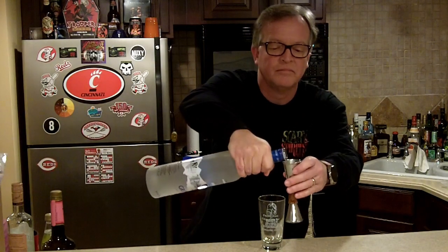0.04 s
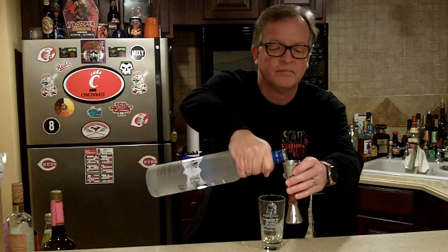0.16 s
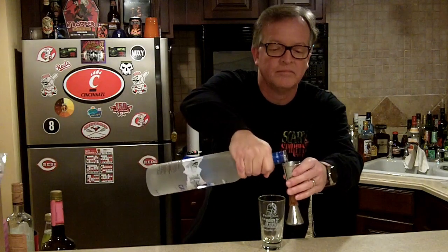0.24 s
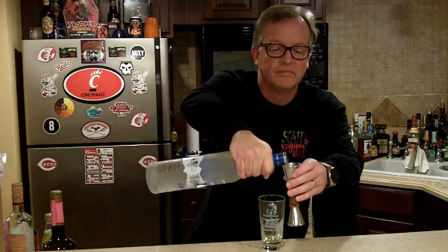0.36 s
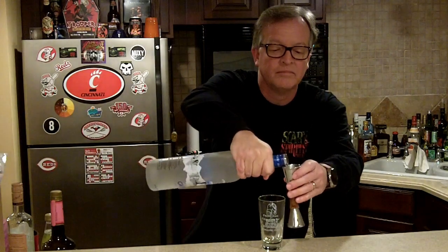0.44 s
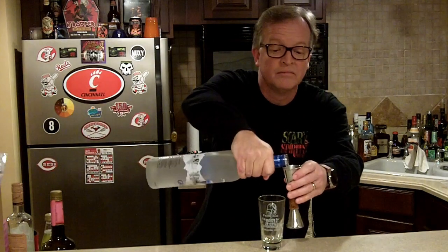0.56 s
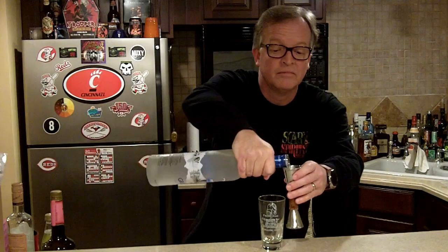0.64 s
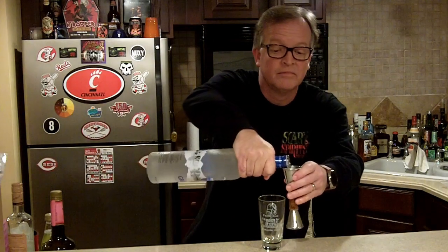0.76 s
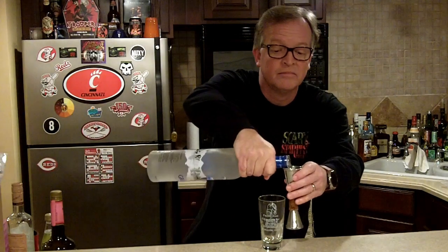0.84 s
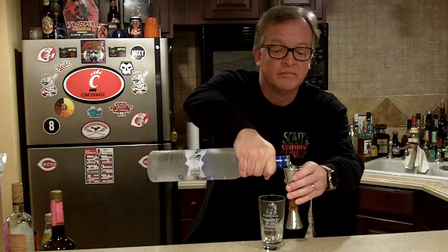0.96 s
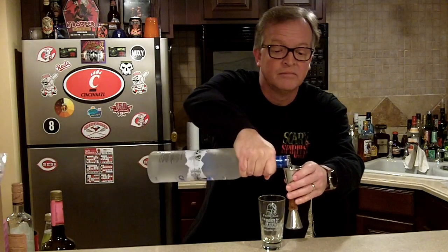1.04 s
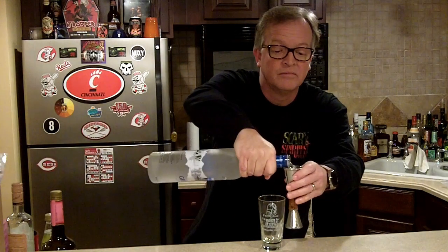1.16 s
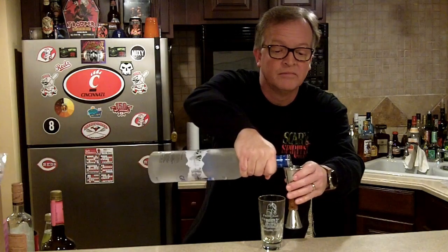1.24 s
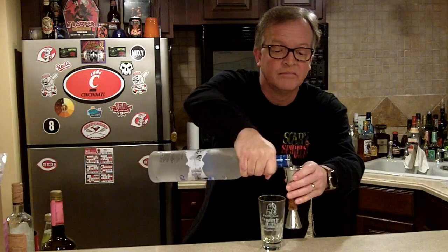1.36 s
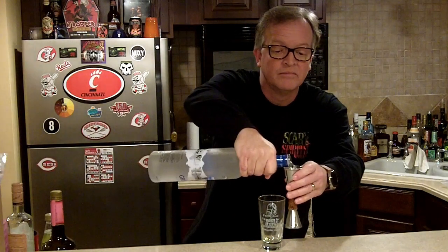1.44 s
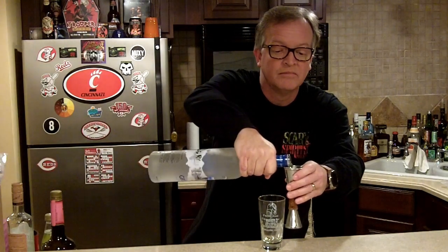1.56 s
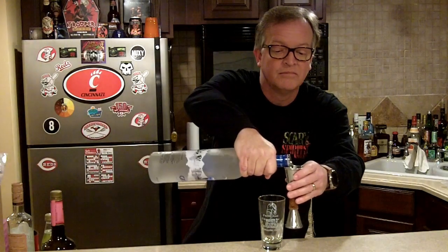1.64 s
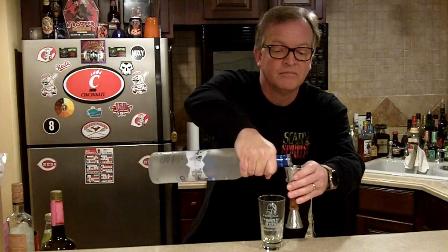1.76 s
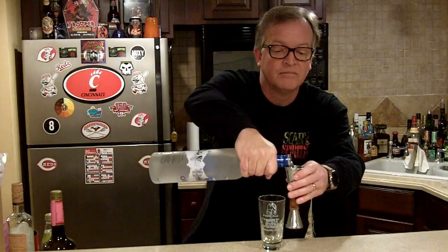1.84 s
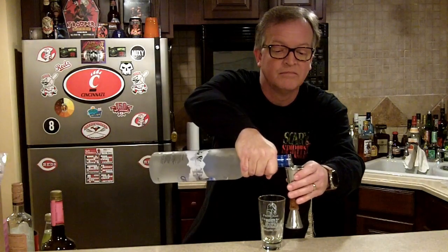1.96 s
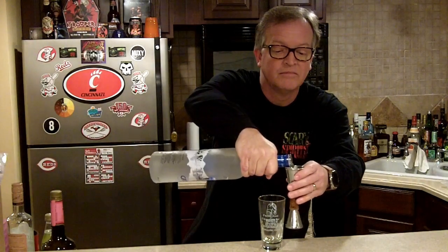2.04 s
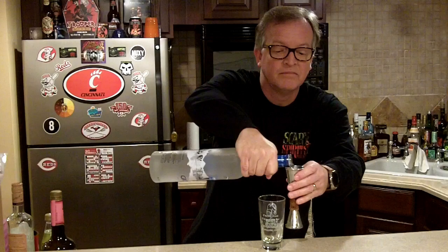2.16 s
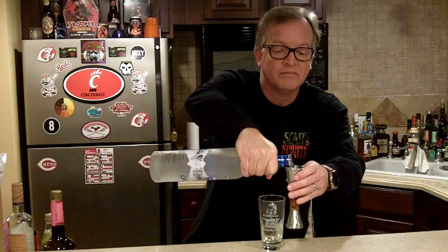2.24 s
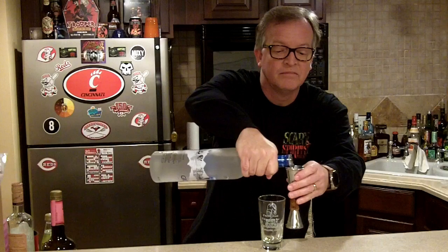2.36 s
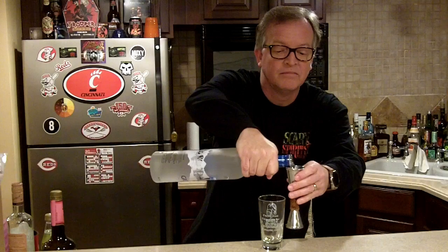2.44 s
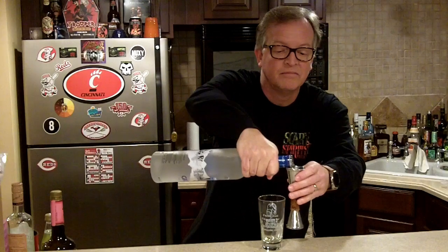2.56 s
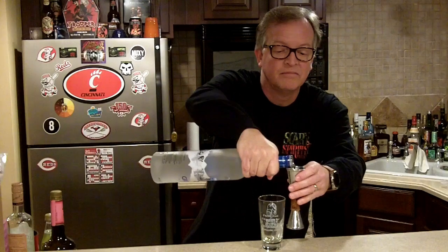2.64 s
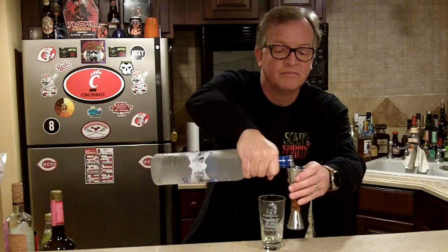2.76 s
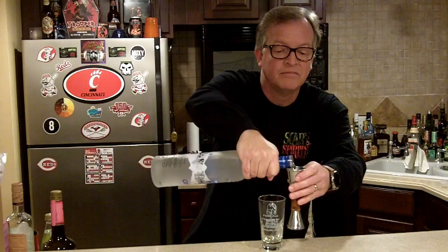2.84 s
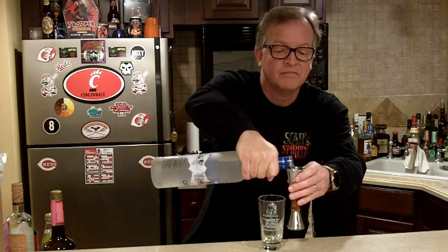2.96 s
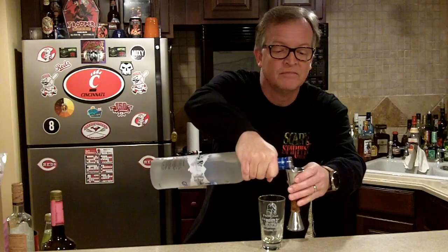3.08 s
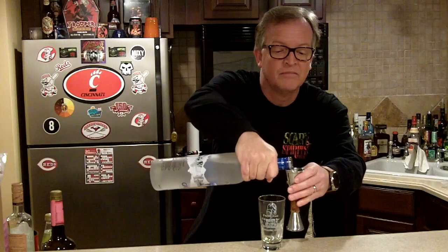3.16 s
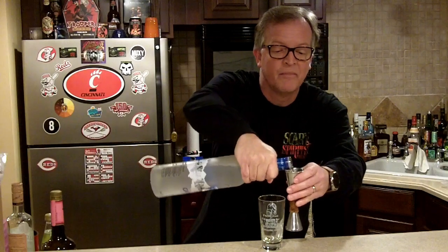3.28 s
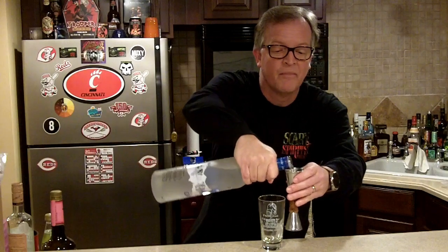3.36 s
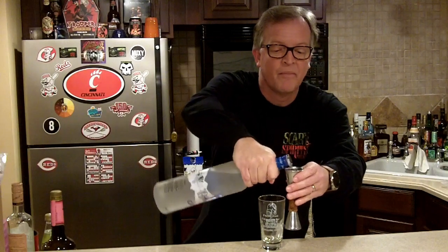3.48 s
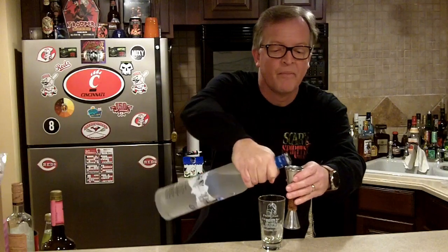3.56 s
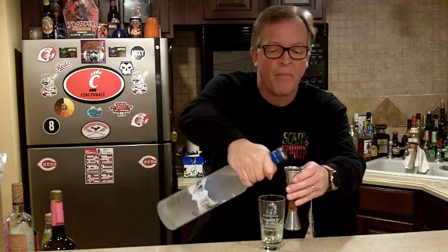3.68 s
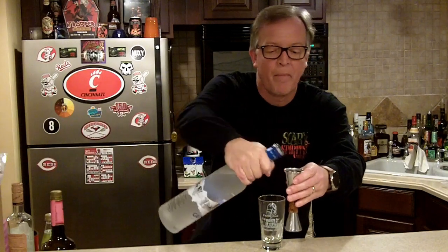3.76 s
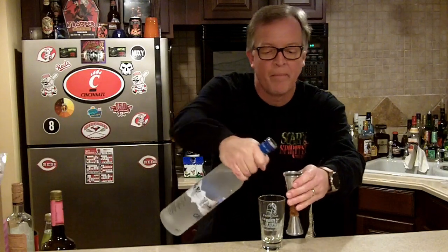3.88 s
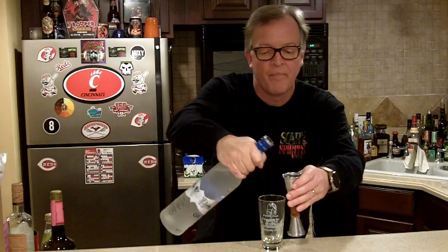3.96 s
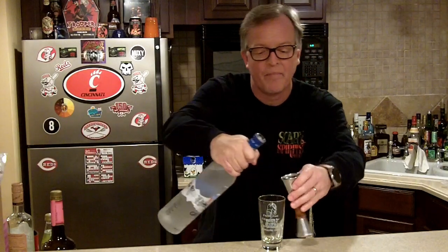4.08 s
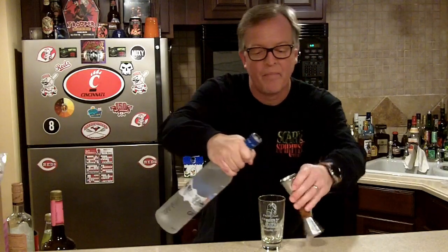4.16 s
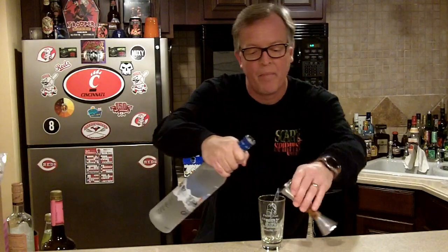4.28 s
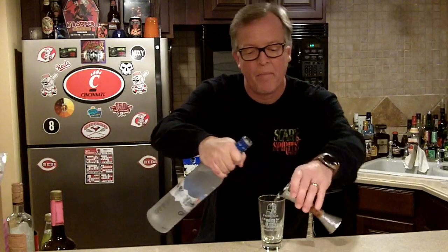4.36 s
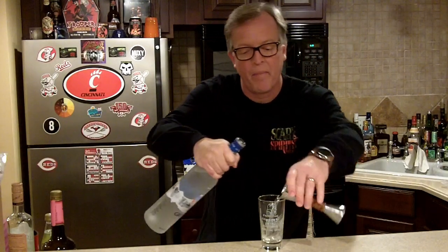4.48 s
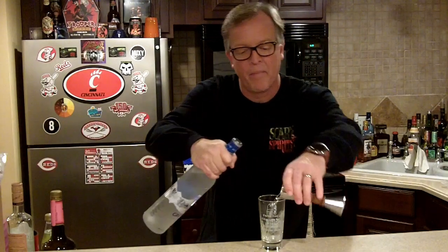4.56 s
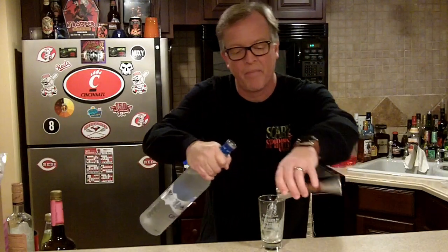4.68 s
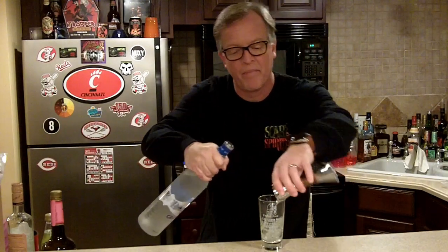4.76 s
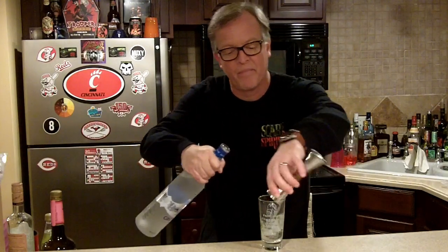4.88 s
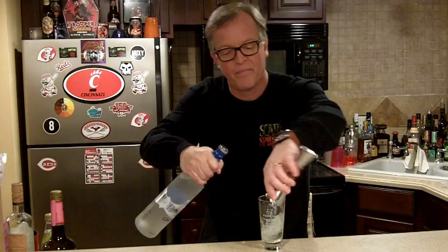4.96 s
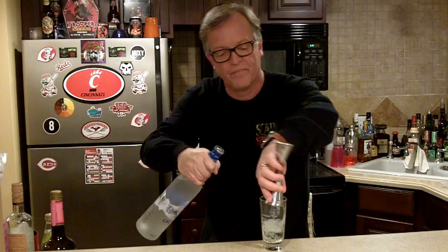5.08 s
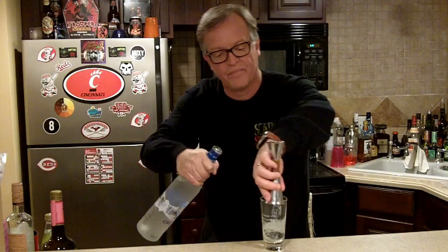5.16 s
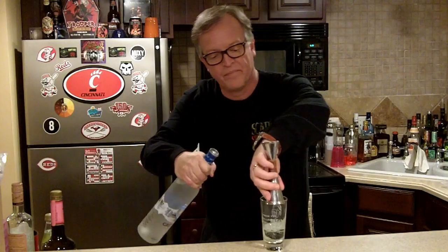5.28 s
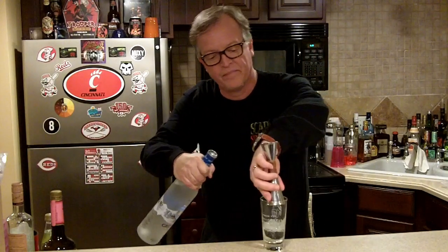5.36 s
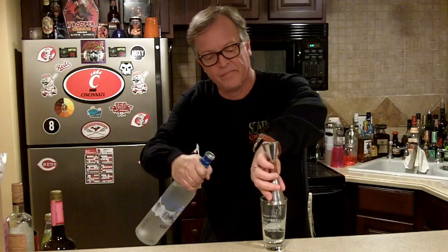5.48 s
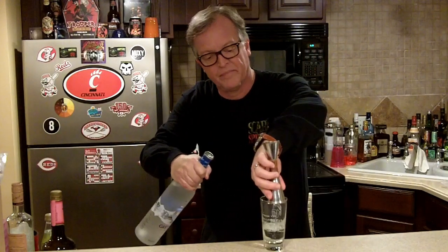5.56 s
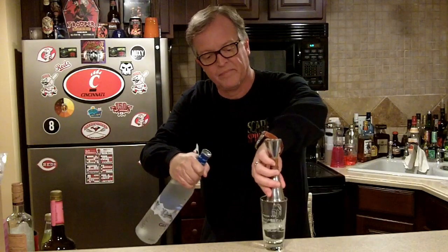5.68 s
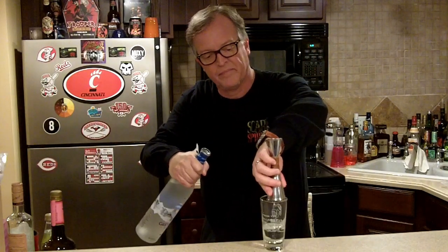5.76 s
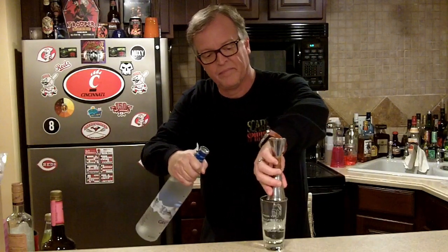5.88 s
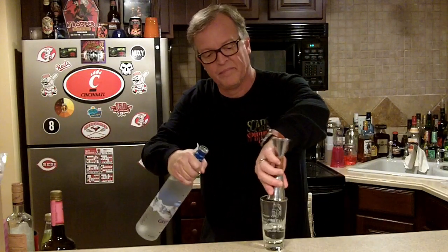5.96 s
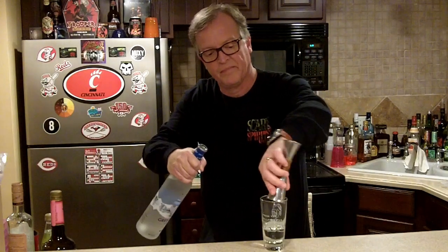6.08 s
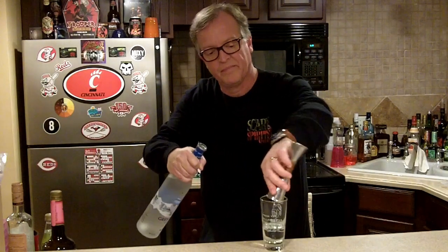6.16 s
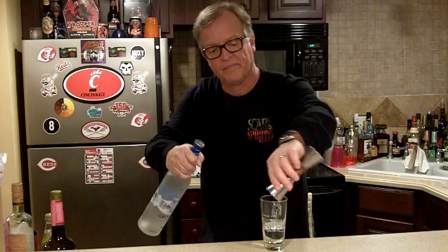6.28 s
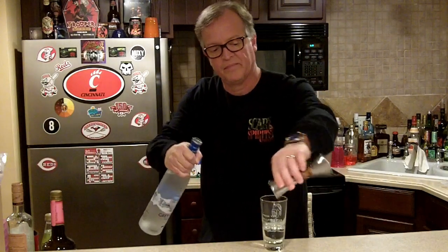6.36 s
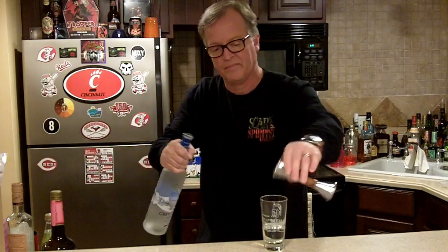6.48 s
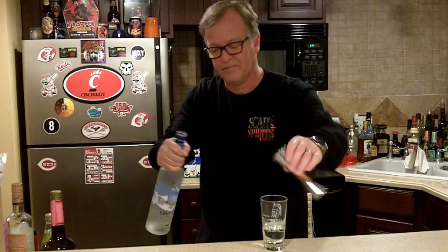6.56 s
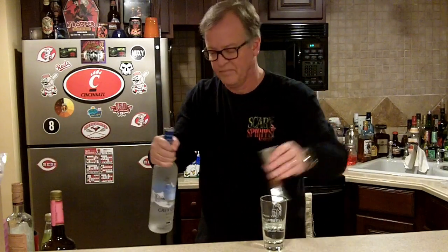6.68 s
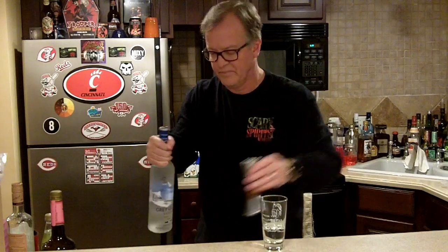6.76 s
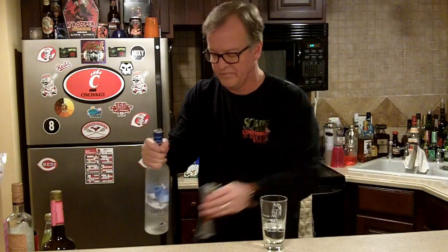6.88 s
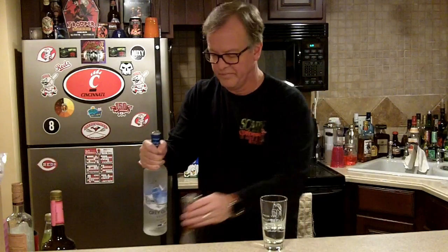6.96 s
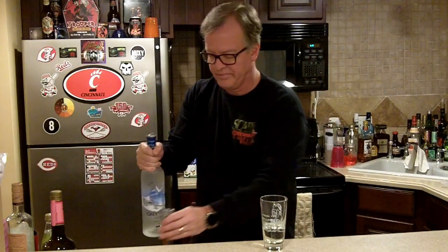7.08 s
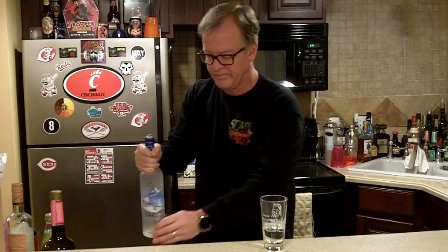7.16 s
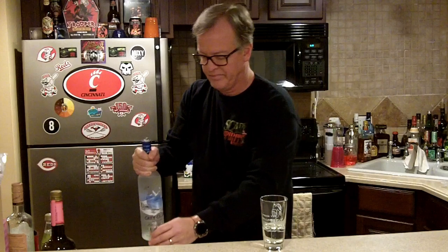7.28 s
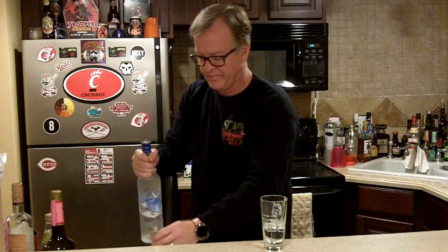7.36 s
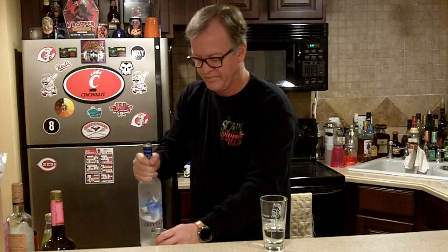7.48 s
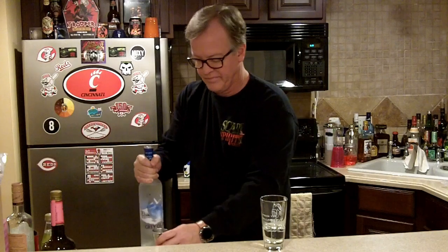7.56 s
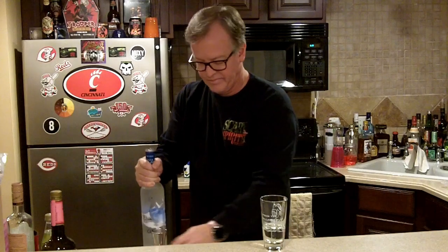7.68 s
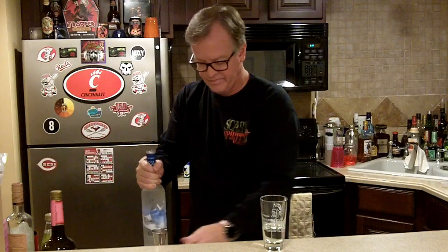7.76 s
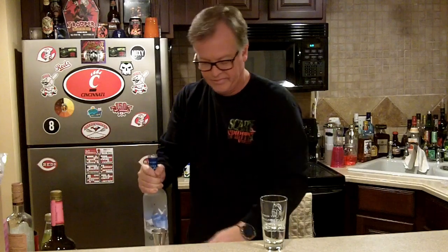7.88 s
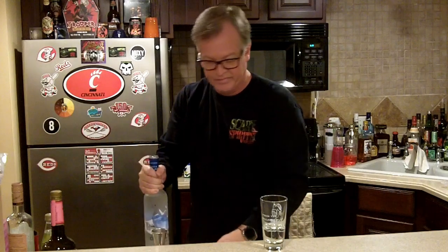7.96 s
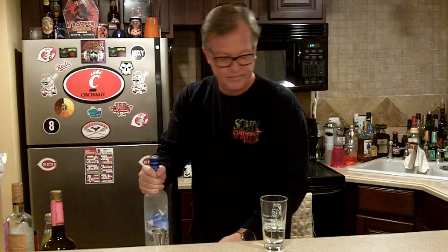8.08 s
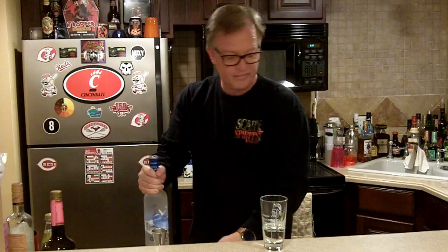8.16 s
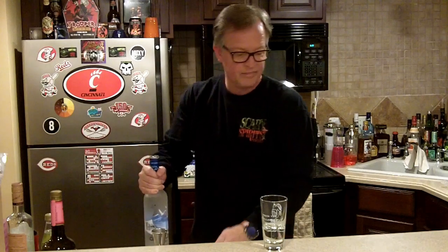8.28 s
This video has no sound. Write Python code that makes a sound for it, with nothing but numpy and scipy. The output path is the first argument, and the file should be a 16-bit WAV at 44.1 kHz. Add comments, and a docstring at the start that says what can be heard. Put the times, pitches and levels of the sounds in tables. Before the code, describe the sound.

In a quiet kitchen, a long glass bottle glugs about five times a second into a small metal measure, with tiny drips and trickles. The measure clinks on a drinking glass, its liquid splashes in with bubbly plops, then it taps the rim several times. The cup lands on the counter with a sharp knock, followed by a heavier bottle thud. A nearby camera microphone adds low rumble, soft hiss and faint whine.

```python
"""In a quiet kitchen a long bottle glugs into a small metal cup; the cup is tipped into a glass,
tapped on its rim a few times and set down on the counter, then the bottle. A camera hisses and whines.
Bubbles, glass, metal and counter ring as dying sines; cracks, thuds, hiss and a brief brush are
shaped noise; spray is a crowd of tiny bubbles. Echoes and a decaying tail answer all but the camera."""
import sys
import numpy as np
from scipy import signal
from scipy.fft import rfft, irfft, next_fast_len
from scipy.io import wavfile
from scipy.ndimage import uniform_filter1d

SR = 44100
rng = np.random.default_rng(int(sys.argv[2]) if len(sys.argv) > 2 else 0)


def unload_audio(sound):
    """Save the sound as a 16-bit wav file, at the path given as the first command line argument."""
    columns = np.transpose(np.atleast_2d(sound))
    # keep every value between -1 and 1, then stretch to whole-number steps
    steps = np.round(np.clip(columns, -1, 1) * 32767)
    wavfile.write(sys.argv[1], SR, steps.astype(np.int16))


N = 367308  # samples

# camera rumble and hiss, spectrum: (frequency [Hz], relative density [dB per Hz])
HISS_SPECTRUM = [(5, -1.5), (25, -0.5), (60, -8), (150, -16.5), (400, -22.5), (1000, -30.5), (2000, -35.5),
                 (3200, -40), (4500, -43.5), (6200, -43), (7000, -41.5), (10000, -41.5), (15000, -42)]
# channel difference: (frequency [Hz], gain on the difference noise [dB])
SIDE_SPECTRUM = [(60, -21.5), (110, -22), (200, -20.5), (380, -17.5), (700, -13.5), (1290, -11), (2380, -7),
                 (4400, -11.5), (8120, -6.5), (15000, -2)]
# steady whines: (frequency [Hz], level [dB rms])
WHINES = [(1200, -80), (1320, -85), (2398, -90), (7866.7, -85)]
# tones gated once a camera frame: (frequency [Hz], level while on [dB rms])
FRAME_TONES = [(3066, -73), (8520, -86), (10935, -85), (6800, -89), (11600, -89)]
HISS_DB = -52.5
FRAME_HZ, MID_BURST_S, FRAME_DUTY = 29.97, 3.8132, 0.42  # duty: share of the frame switched on
# microphone cavity: (frequency [Hz], width [Hz], gain at centre [dB])
CAVITY_NOTCHES = [(5470, 440, -28), (5320, 890, -6)]
# resting offset, one row a channel: (offset [full scale])
CHANNEL_OFFSET = [
    [-.00485],
    [.0013],
]
BAND_LIMIT_HZ = 15170

# reverberant tail: (frequency [Hz], t60 [s])
ROOM_T60 = [(60, 0.44), (150, 0.36), (500, 0.36), (2000, 0.32), (5000, 0.3), (12000, 0.19)]
# flutter between facing cupboards: (delay [s], gain [dB])
CUPBOARD_ECHOES = [(.022, -12), (0.041, -19), (.063, -21)]

# cup meets counter: (time [s], level [dB], contact [s], tilt [dB per octave])
CUP_LANDINGS = [(7.4905, -23.5, 0.01, 0.48), (7.729, -47.5, 0.0066, -1.7), (7.746, -49, 0.0025, -2),
                (7.772, -50, 0.013, -4.5), (7.82, -58.5, 0.024, -4)]
# bottle meets counter: (time [s], level [dB], contact [s], tilt [dB per octave])
BOTTLE_LANDINGS = [(8.026, -17.5, 0.018, 0.46), (8.287, -43, 0.023, -5)]
# colour of the cup contact: (frequency [Hz], relative density [dB per Hz])
CUP_THUD_SPECTRUM = [(30, -33), (80, -14), (181, 1.5), (471, -4), (1480, 0), (2700, -8), (4440, -17.5),
                     (6000, -17.5), (8500, -19), (10700, -35), (15000, -42)]
# colour of the bottle contact: (frequency [Hz], relative density [dB per Hz])
BOTTLE_THUD_SPECTRUM = [(18, -39), (30, -13), (150, 4.5), (288, -6.5), (698, -6.5), (815, -12.5),
                        (1090, -8.5), (1690, -13.5), (2030, -14.5), (5440, -39.5), (6040, -36), (8470, -45),
                        (15000, -65)]
# cup ringing on the counter: (frequency [Hz], relative level [dB], t60 [s])
CUP_COUNTER_MODES = [(123, -2.5, 0.18), (157.4, 2, .15), (196, 3.5, 0.18), (315.4, -8, 0.35),
                     (713, -9.5, 0.32), (1030, -12, 0.064), (1280, -21, 0.14), (1580, -6, 0.18),
                     (1900, -11, 0.22), (2086, -6.5, 0.11), (2356, 1.5, 0.074), (2740, 7.5, 0.021),
                     (4130, -1, 0.059), (6120, -12, 0.17), (7060, -10, 0.1), (8400, -2, 0.1),
                     (8410, -16, 0.19), (9367, -16, 0.12)]
# bottle ringing on the counter: (frequency [Hz], relative level [dB], t60 [s])
BOTTLE_COUNTER_MODES = [(127.6, 6, 0.22), (156, -5, 0.23), (203, -2.5, 0.2), (290, -7, 0.24),
                        (337, -6.5, 0.29), (402, 0.5, 0.17), (483, -7.5, 0.21), (640, -9, 0.19),
                        (701, -7, 0.22), (926, -3, 0.14), (1120, 1, 0.14), (1500, -13, 0.28),
                        (1890, -10, 0.28), (2010, -25.5, 0.62), (6100, -30, 0.33), (6266, -28, 0.19),
                        (8450, -26, 0.29)]
RING_UNDER_THUD_DB, RING_DB_PER_TILT_DB = -7, 2.7  # a duller contact rings less
# one brief brush: (time [s], Gaussian half length [s], level [dB], centre [Hz], width [Hz])
BRUSH = (8.192, .013, -56, 8000, 3000)

# cup on glass: (time [s], crack level [dB], crack tilt [dB per octave], glass level [dB],
#   cup level [dB], hollow frequency [Hz], hollow level [dB], freedom: factor on glass t60 [-])
CLINK_EVENTS = [(4.4865, -28, -3.5, -29.5, -28.5, 1346, -49, 0.46),
                (4.4971, -32.5, -2.5, -40, -38, 620, -45, 0.45),
                (5.606, -35, 1.3, -31.5, -29.5, 775, -38.5, 0.14),
                (5.873, -33, 1.5, -36.5, -32, 914, -38.5, 1.18),
                (6.134, -37.5, 0.7, -36, -37, 870, -38.5, 0.63),
                (6.379, -39.5, 1.5, -40, -38, 923, -54, 1.28)]
# glass, low and high group: (frequency [Hz], relative level [dB], t60 at freedom 1 [s])
GLASS_GROUPS = [(2454, -5.5, 0.42), (2488, -2.5, 0.065)], [(4220, -2, 0.28), (4200, -23, 0.34),
                (4150, -8, 0.12)]
# cup, low and high group: (frequency [Hz], relative level [dB], t60 before damping [s])
CUP_GROUPS = ([(6100, -27, 0.16), (6300, -22, 0.044), (6430, -24, 0.084), (7265, -6.5, 0.22),
              (7300, -1, 0.1)], [(8250, -2, 0.13), (8600, -23, 0.067), (9300, -6, 0.057), (9900, -9.5, 0.1),
              (11400, -9.5, 0.072), (12150, -10, .07)])
# crack of a hard contact, also snap of a bubble: (frequency [Hz], relative density [dB per Hz])
CRACK_SPECTRUM = [(80, -19), (200, -1.5), (900, 1), (2500, -4), (4500, -9), (8250, -3), (11900, -26),
                  (15000, -42)]
# cup knocks inside the filled glass: (time [s], reference level [dB])
INNER_KNOCK = (5.1135, -29.5)
# filled glass and cup together: (frequency [Hz], relative level [dB], t60 [s])
FILLED_MODES = [(469, -3.5, 0.065), (783, 2.5, 0.11), (1580, -18, .09), (2532, -11, 0.19),
                (2510, -6.5, 0.095), (4370, -15.5, 0.14), (6200, -0.5, 0.069), (6840, -5, 0.074),
                (7600, 9.5, 0.051), (8330, 4.5, 0.052), (9300, -27, .14), (9502, -24, 0.1),
                (11500, -15, 0.097), (11920, -13, 0.077)]
# high group against its low group: at freedom 0 [dB], per unit of freedom [dB]
GLASS_TOP_DAMPED_DB, GLASS_TOP_PER_FREEDOM_DB = -9.5, 5.5
CUP_TOP_DAMPED_DB, CUP_TOP_PER_FREEDOM_DB = -15.5, 13
CUP_DAMPED, CUP_PER_FREEDOM = 0.33, 0.22  # factor on cup t60 at freedom 0, its rise per unit

# loudest bubbles and drops in cup and glass: (time [s], level [dB], starting pitch [Hz])
DROP_EVENTS = [(1.080, -49, 3460), (1.080, -53, 2360), (1.114, -38, 3400), (1.114, -44, 6450),
               (1.130, -35, 1526), (1.206, -42, 3130), (1.204, -47, 6260), (1.312, -50.5, 1800),
               (1.393, -39, 4640), (1.394, -47, 866), (1.421, -46.5, 1735), (1.508, -45.5, 6170),
               (1.577, -52.5, 2230), (1.67, -53, 1880), (1.776, -52, 2280), (1.854, -53, 6530),
               (4.65, -55, 4800), (4.679, -51, 3700), (4.679, -48, 7000), (4.70, -44, 4620),
               (4.74, -46, 3440), (4.774, -40, 3740), (4.772, -44.5, 2340), (4.79, -46.5, 1650),
               (4.80, -48, 943), (4.862, -48, 1220), (4.876, -37.5, 1314), (4.876, -46, 940),
               (4.905, -45, 4720), (5.029, -38, 920), (5.045, -41, 7800), (5.14, -41, 685),
               (5.17, -33.5, 765), (5.26, -45.5, 11300)]
DROP_T60_1KHZ_S, DROP_SHORTENING = 0.048, 0.48  # t60 falls as pitch to this power
# surges of spray: (time [s], hold [s], lower part level [dB], fine upper part level [dB])
SURGES = [(1.117, 0.023, -55, -70), (1.192, .02, -55, -61.5), (1.3, .05, -65, -75),
          (1.38, 0.024, -60.5, -74), (1.56, 0.13, -69, -80), (1.706, .015, -63, -65),
          (1.868, 0.014, -72, -82), (4.661, 0.084, -72, -64.5), (4.776, 0.11, -56, -63),
          (4.959, 0.23, -63.5, -66), (5.226, .02, -77, -68.5)]
SURGE_RISE_S, SURGE_T60_S = 0.0077, 0.24

# air bubbles entering the bottle neck: (time [s], level [dB], neck pitch [Hz])
GLUG_EVENTS = [(0.0464, -42, 996), (0.2591, -38.5, 1039), (0.462, -38, 1081), (0.6532, -35, 1101),
               (0.843, -36.5, 1092), (1.013, -34.5, 1087), (1.1885, -35, 1062), (1.3625, -36.5, 1083),
               (1.539, -36, 1063), (1.716, -40, 1096), (1.8921, -37.5, 1095), (2.1009, -42.5, 1119),
               (2.309, -40, 1119), (2.5232, -37.5, 1150), (2.7343, -47.5, 1114), (2.9498, -41.5, 1140),
               (3.1758, -49.5, 1122)]
# air in the neck: (multiple of neck pitch [-], relative level [dB], t60 [s])
NECK_MODES = [(0.661, -12, 0.035), (1, 1.5, 0.063), (1.33, -21, 0.037), (2.6, -13.5, 0.03),
              (2.78, -13, 0.025), (4.2, -15.5, 0.02), (5.6, -25, 0.025), (7.3, -36, .015)]
# light touches of bottle and cup: (time [s], level [dB],
#   modes as (frequency [Hz], relative level [dB], t60 [s]))
TOUCH_EVENTS = [(.160, -47, [(1930, -8.5, 0.48), (1830, 3, 0.034)]), (3.2515, -52, [(6500, 7, 0.032),
                (4080, -13, 0.14), (5760, -12, .1), (7500, -11, .06), (6800, -7, 0.043)])]


def gain_of(db):
    """Level in dB to amplitude factor."""
    return 10 ** (np.asarray(db) / 20)


def evened(x):
    """Scales to unit rms."""
    return x / np.sqrt(np.mean(x ** 2) + 1e-20)


def read(points, hz):
    """Interpolates a table over log frequency."""
    f, value = np.transpose(points)
    return np.interp(np.log(hz + 1), np.log(f + 1), value)


def add(mix, s, sound):
    """Adds a sound in place at s seconds, cut at the end of the mix."""
    part = mix[round(s * SR):][:len(sound)]
    part += sound[:len(part)]


def filtered(x, points, tilt_db=0):
    """Shapes x by a spectrum and a tilt in dB per octave around 1 kHz."""
    size = next_fast_len(len(x))
    hz = np.fft.rfftfreq(size, 1 / SR)
    gain_db = read(points, hz) + tilt_db * np.log2(hz / 1000 + 0.012)
    return irfft(rfft(x, size) * gain_of(gain_db), size)[:len(x)]


def coloured(x, points, tilt_db=0):
    """Shaped by a spectrum, at unit rms."""
    return evened(filtered(x, points, tilt_db))


def ring(modes, rise_s=0.00036, glide=0):
    """Dying sines; glide lifts the pitch as a bubble nears the surface."""
    hz, db, t60 = np.transpose(modes)[..., None]
    t = np.arange(int(t60.max() * SR) + 1) / SR
    start = rng.choice([0, 0.5], hz.shape)  # a blow starts each mode up or down
    turns = hz * (t + glide * t ** 2 / t60) + start
    decay = gain_of(db - 60 * t / t60)
    return (decay * np.sin(2 * np.pi * turns)).sum(0) * (1 - np.exp(-t / rise_s))


def burst(points, hold_s, t60_s, tilt_db=0):
    """Coloured noise that starts at once, holds through the contact and dies."""
    t = np.arange(8192) / SR
    decay = gain_of(-60 * np.maximum(t - hold_s, 0) / t60_s)
    shape = decay * (1 - np.exp(-t / 0.00046))
    return coloured(rng.standard_normal(len(t)), points, tilt_db) * shape


def tones(rows, t):
    """Sum of steady sines of given rms level and random phase."""
    out = 0
    for hz, db in rows:
        out = out + np.sqrt(2) * gain_of(db) * np.sin(2 * np.pi * (hz * t + rng.random()))
    return out


def camera():
    """Rumble and hiss, steady whines, and tones switched on once every camera frame."""
    t = np.arange(N) / SR
    # clock restarts every frame, so the bursts are alike
    frame_t = (((t - MID_BURST_S) * FRAME_HZ + 0.5) % 1 - 0.5) / FRAME_HZ
    on = abs(frame_t) < FRAME_DUTY / FRAME_HZ / 2
    gate = uniform_filter1d(1.0 * on, size=40)
    shared = gain_of(HISS_DB) * coloured(rng.standard_normal(N), HISS_SPECTRUM)
    other = gain_of(HISS_DB) * coloured(rng.standard_normal(N), HISS_SPECTRUM)
    mid = shared + tones(WHINES, t) + gate * tones(FRAME_TONES, frame_t)
    side = filtered(other, SIDE_SPECTRUM)
    return np.array([mid + side, mid - side])


def kitchen(x):
    """A few strong echoes over sparse taps of random sign, each band dying at its own speed."""
    taps = np.zeros(SR // 2)
    at = np.arange(200, len(taps) - 20, 20)
    taps[at + rng.integers(0, 20, len(at))] = rng.choice([-1.0, 1.0], len(at))
    hz, t, bands = signal.stft(taps, SR, nperseg=256)
    decay = gain_of(-60 * t / read(ROOM_T60, hz)[:, None])
    tail = signal.istft(bands * decay, SR, nperseg=256)[1]
    tail = gain_of(-1.0) * tail / np.linalg.norm(tail)
    for delay_s, db in CUPBOARD_ECHOES:
        add(tail, delay_s, gain_of([db]))
    return signal.fftconvolve(x, tail)[:N]


def landings(events, thud, modes):
    """A rough contact shakes the counter top and rings what is set down."""
    out = np.zeros(N)
    for s, db, contact_s, tilt_db in events:
        add(out, s, gain_of(db) * burst(thud, contact_s, 0.14, tilt_db))
        ring_db = db + RING_UNDER_THUD_DB + RING_DB_PER_TILT_DB * tilt_db
        tilted = [(hz, ring_db + d + tilt_db * np.log2(hz / 1000), t60) for hz, d, t60 in modes]
        add(out, s, ring(tilted, rise_s=0.00048))
    return out


def brush():
    """Band of noise under one Gaussian stroke."""
    s, half_s, db, hz, width_hz = BRUSH
    band = [(hz - width_hz, -30), (hz - width_hz / 2, 0),
            (hz + width_hz / 2, 0), (hz + width_hz * 1.5, -30)]
    stroke = np.exp(-0.5 * ((np.arange(N) / SR - s) / half_s) ** 2)
    return gain_of(db) * stroke * coloured(rng.standard_normal(N), band)


def counter():
    """Cup and bottle set down, and the brush."""
    cup = landings(CUP_LANDINGS, CUP_THUD_SPECTRUM, CUP_COUNTER_MODES)
    bottle_down = landings(BOTTLE_LANDINGS, BOTTLE_THUD_SPECTRUM, BOTTLE_COUNTER_MODES)
    return cup + bottle_down + brush()


def clinks():
    """A crack, then glass, cup and the air inside the glass ring, more or less damped by the hand."""
    out = np.zeros(N)
    for s, crack_db, tilt_db, glass_db, cup_db, hollow_hz, hollow_db, freedom in CLINK_EVENTS:
        glass_top_db = glass_db + GLASS_TOP_DAMPED_DB + GLASS_TOP_PER_FREEDOM_DB * freedom
        cup_top_db = cup_db + CUP_TOP_DAMPED_DB + CUP_TOP_PER_FREEDOM_DB * freedom
        cup_factor = CUP_DAMPED + CUP_PER_FREEDOM * freedom
        levels_db = [glass_db, glass_top_db, cup_db, cup_top_db]
        factors = [freedom, freedom, cup_factor, cup_factor]
        modes = [(hollow_hz, hollow_db, 0.07)]
        for group, db, factor in zip([*GLASS_GROUPS, *CUP_GROUPS], levels_db, factors):
            modes += [(hz, d + db, t60 * factor) for hz, d, t60 in group]
        add(out, s, ring(modes))
        add(out, s, gain_of(crack_db) * burst(CRACK_SPECTRUM, 0.00056, 0.052, tilt_db))
    return out


def inner_knock():
    """Cup and filled glass ring as one, with a brighter crack."""
    out = np.zeros(N)
    s, db = INNER_KNOCK
    add(out, s, gain_of(db - 5.5) * ring(FILLED_MODES))
    add(out, s, gain_of(db - 4.0) * burst(CRACK_SPECTRUM, 0.0067, 0.018, tilt_db=4.0))
    return out


def spray(low_hz, high_hz, level_column, cycles, per_s):
    """Many tiny bubbles of random size and time in 24 pitches; surges share one rise and decay."""
    t, grains, level = np.arange(N) / SR, np.zeros(N), np.zeros(N)
    for hz in np.geomspace(low_hz, high_hz, num=24):
        sizes = gain_of(2.4 * np.minimum(rng.exponential(1, N), 4))
        train = sizes * (rng.random(N) < per_s / SR)
        bubble = ring([(hz, 0, cycles / hz)], rise_s=0.00007, glide=0.083)
        grains += signal.oaconvolve(train, bubble)[:N]
    for s, hold_s, *levels_db in SURGES:
        rise = np.clip((t - s) / SURGE_RISE_S, 0, 1)
        fall_db = 60 * np.maximum(t - s - hold_s, 0) / SURGE_T60_S
        level += rise * gain_of(levels_db[level_column] - fall_db)
    return evened(grains) * level


def drops():
    """Each drop slaps the surface and drags down a bubble with three weaker neighbours."""
    out = np.zeros(N)
    for s, db, hz in DROP_EVENTS:
        t60_s = DROP_T60_1KHZ_S * (1000 / hz) ** DROP_SHORTENING
        slap = [(hz / 3, -24), (hz / 1.7, 0), (hz * 1.1, 0), (hz * 3, -20)]
        add(out, s, gain_of(db - 13) * burst(slap, 0.001, 0.025))
        add(out, s, ring([(hz, db, t60_s)], rise_s=0.00062, glide=0.033))
        for late_s, detune in rng.uniform([0.001, -1], [0.02, 1], (3, 2)):
            neighbour = [(hz * (1 + 0.15 * detune), db - 6, 0.53 * t60_s)]
            add(out, s + late_s, ring(neighbour, rise_s=0.00044, glide=0.039))
    return out


def liquid():
    """Single drops over low and fine spray."""
    low = spray(927, 4890, level_column=0, cycles=89, per_s=16)
    high = spray(5040, 9500, level_column=1, cycles=82, per_s=21)
    return drops() + low + high


def touches():
    """Light touches ring bottle or cup."""
    out = np.zeros(N)
    for s, db, modes in TOUCH_EVENTS:
        add(out, s, gain_of(db) * ring(modes))
    return out


def bottle():
    """Each bubble snaps off and rings the air in the neck."""
    out = np.zeros(N)
    for s, db, hz in GLUG_EVENTS:
        modes = []
        for multiple, d, t60 in NECK_MODES:
            spread_db = 3 * rng.standard_normal() * (multiple > 2)  # upper modes vary
            modes.append((multiple * hz, db + d + spread_db, t60))
        start_s = s - 0.002  # the table time falls just after the onset
        add(out, start_s, ring(modes, rise_s=0.00096))
        add(out, start_s, gain_of(db - 13.5) * burst(CRACK_SPECTRUM, 0, 0.016))
    return out


def scene():
    """Direct sound, its kitchen reverberation and the camera noise."""
    pour = bottle() + touches() + liquid()
    taps = clinks() + inner_knock()
    thuds = counter()
    wet = kitchen(gain_of(-5.5) * pour + gain_of(-5.5) * taps + gain_of(-6.5) * thuds)
    return pour + taps + thuds + wet + camera()


def record(dry):
    """The microphone cavity cuts narrow bands; then a low-pass and each channel's offset."""
    for hz, width_hz, db in CAVITY_NOTCHES:
        band = signal.lfilter(*signal.iirpeak(hz, hz / width_hz, SR), dry)
        dry = dry - (1 - gain_of(db)) * band
    lowpass = signal.firwin(1023, BAND_LIMIT_HZ, window=("kaiser", 9), fs=SR)
    return signal.oaconvolve(dry, lowpass[None], "same") + CHANNEL_OFFSET


dry = scene()
out = record(dry)
unload_audio(out)
```